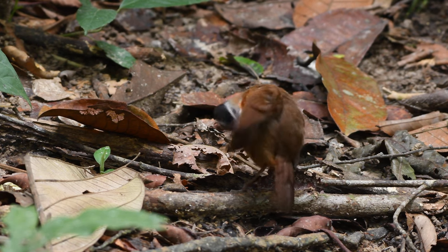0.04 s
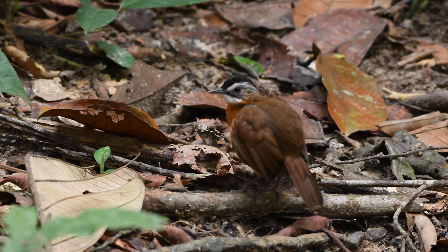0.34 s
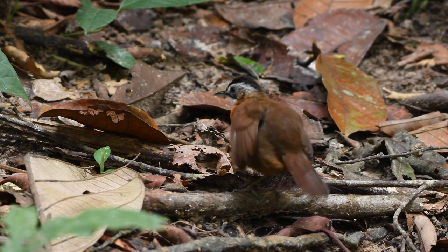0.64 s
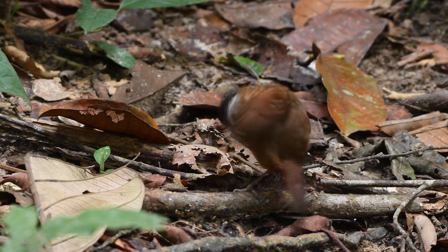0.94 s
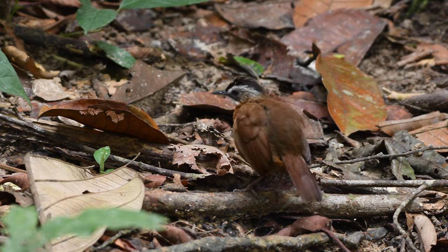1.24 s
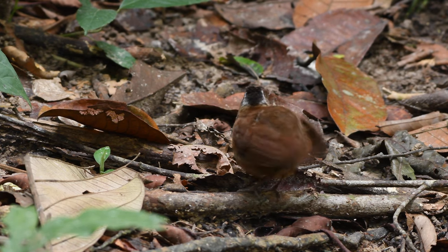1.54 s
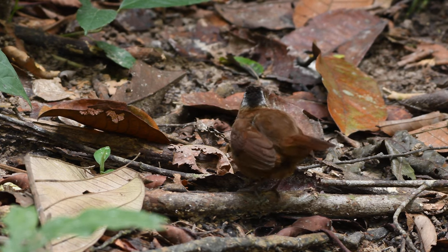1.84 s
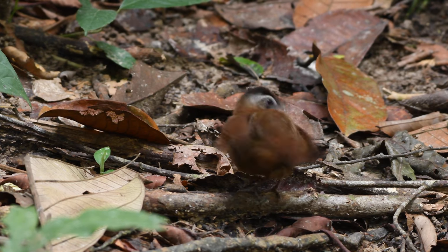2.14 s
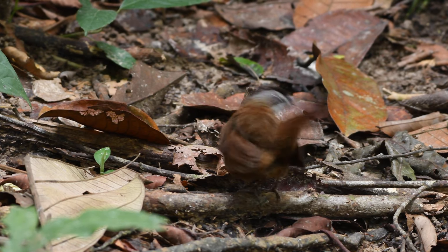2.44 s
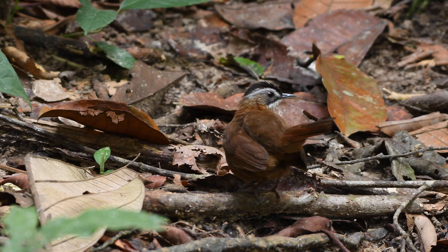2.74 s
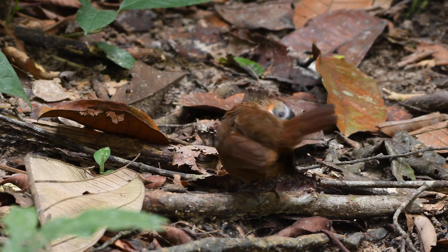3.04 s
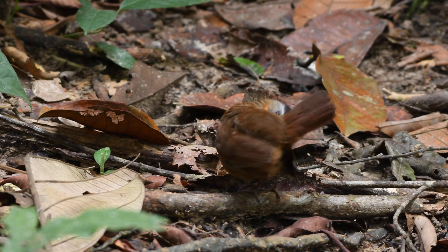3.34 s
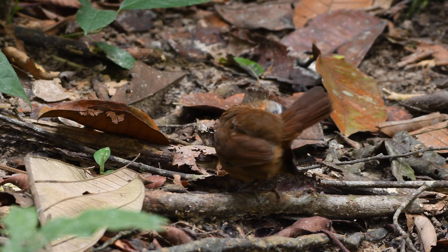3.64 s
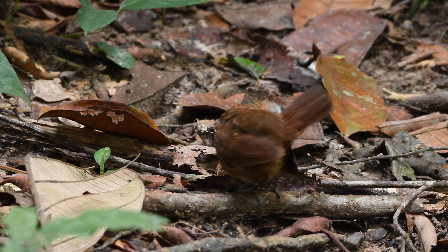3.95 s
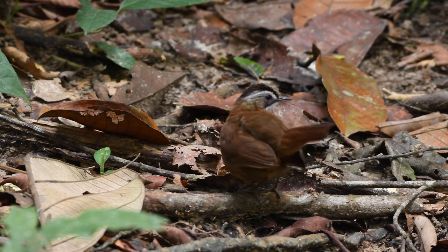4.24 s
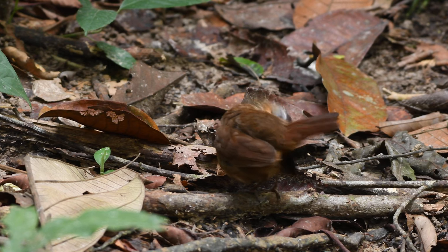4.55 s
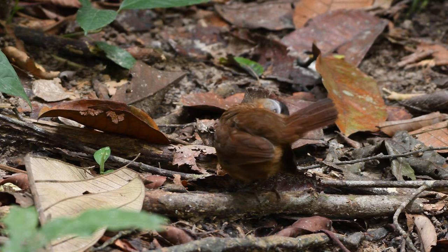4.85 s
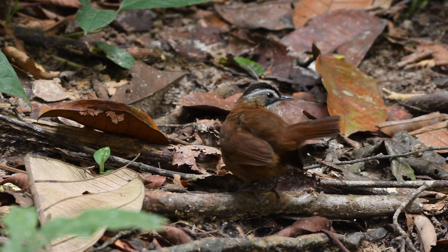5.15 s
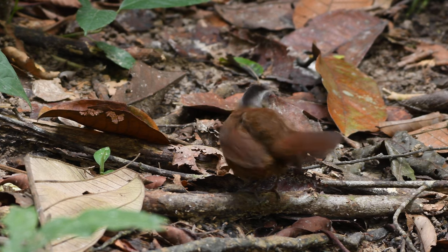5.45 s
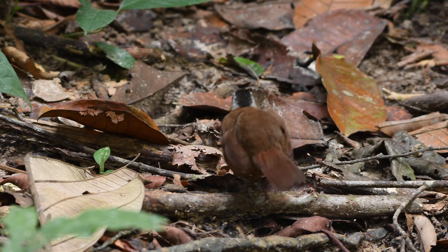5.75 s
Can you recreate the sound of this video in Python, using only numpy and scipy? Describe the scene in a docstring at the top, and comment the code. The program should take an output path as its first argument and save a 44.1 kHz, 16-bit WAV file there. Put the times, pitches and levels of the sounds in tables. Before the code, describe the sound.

A high, shrill cicada chorus drones steadily for the whole six seconds in a forest, over a very faint low rumble. Single insects trill through it in fast-pulsing phrases of about half a second, and a thin buzz swells and fades. One faint low hoot sounds at the very start. Distant birds give quiet, echoing whistles and slurs throughout, with runs of short piping notes around 1.5 to 1.9 and 2.9 to 3.7 seconds. Close by, the leaf litter ticks faintly; a soft thud comes at 1.4 seconds, small twig snaps on the right at 1.6 and 1.9, and faint rustles near 2.4 and 3.1. From about 4.4 seconds to the end, a nearer bird on the left whistles six clear notes, each scooping upward, the series falling in pitch and growing longer and louder. It stands out above the insects and echoes among the trunks.

```python
"""A chorus of cicadas drones near 5.7 kHz over a forest floor by day, each sweeping its pitch about 22
times a second as a muscle tightens its membrane and lets go. Single insects trill in, above and below it.
A bird whistles a falling series of scooped notes, others call from far off, and a few things tick in the
leaf litter. The trunks scatter it all over a faint low rumble."""
import sys
import numpy as np
from scipy import signal
from scipy.fft import rfft, irfft
from scipy.io import wavfile

SR = 44100
rng = np.random.default_rng(int(sys.argv[2]) if len(sys.argv) > 2 else 0)


def materialize(psi):
    """Save the field psi as 16-bit PCM at rate SR to the path in sys.argv[1].

    A 1-D psi becomes a single channel; in a 2-D psi each row is a channel.
    """
    bounded = np.clip(np.atleast_2d(psi).T, -1, 1)
    quanta = np.round(bounded * 32767).astype(np.int16)
    wavfile.write(sys.argv[1], SR, quanta)


N = 254898
TIME = np.arange(N) / SR


# The blur of far cicadas, and its octave. Each row: frequency in Hz, relative level in dB.
DRONE_SPECTRUM = [(4300, -27), (4750, -24.5), (5000, -13.5), (5200, -4.5), (5400, 3), (5600, 1.5),
                  (5850, 6.5), (6020, -4), (6200, -5), (6450, -14.5), (6800, -26.5), (7200, -66),
                  (7700, -130.5)]
OCTAVE_SPECTRUM = [(9500, -44.5), (10100, -3.5), (10500, 1.5), (10800, 7), (11400, 5.5), (11900, 0.5),
                   (12600, -18), (14000, -35.5)]

def cicada_chorus(count=9):
    """Cicadas sweep out of step among the trees; countless far ones blur into a band and its octave."""
    voices = np.zeros((2, N))
    for _ in range(count):
        cycle = rng.random() + np.cumsum(22.4 + 0.3197 * wander(1.3)) / SR
        stroke = muscle_stroke(cycle, crest=0.689)
        hz = 5380 + 480 * stroke + 50 * wander(1.5) + 35 * wander(700)
        pulse = 0.062 + np.sin(np.pi * stroke)  # loudest midway through each rise and fall
        voice = tone(hz) * pulse * undb(1.7 * wander(1.1))
        voices += forest(voice * pan(3 * rng.standard_normal()), t60=0.64, wet_db=5)
    blur = colour(rng.standard_normal((2, N)), DRONE_SPECTRUM)
    blur *= undb(0.13 * wander(7) + .5 * wander(30))
    octave = colour(rng.standard_normal((2, N)), OCTAVE_SPECTRUM) * undb(0.47 * wander(4))
    drone = level(voices, -38.5) + level(blur, -35)
    return drone * pan(-3.5) + level(octave, -67) * pan(10.3)


def muscle_stroke(cycle, crest):
    """A muscle tightens the sounding membrane and lets go: 0 up to 1 at the crest and back."""
    return np.sin(np.pi / 2 * np.interp(cycle % 1, [0, crest, 1], [0, 1, 0]))


# Phrases of three soloists. Each row: start in seconds, length in seconds.
NEAR_PHRASES = [(.019, 0.59), (1.243, 0.44), (2.689, .66), (4.311, 0.48)]
LOW_PHRASES = [(.55, 0.57), (1.45, .63), (2.33, .64), (3.3, .55)]
HIGH_PHRASES = [(.385, 0.87), (1.62, .59), (2.52, .67), (3.5, 0.57), (4.47, .57), (5.46, 0.64)]

def solo_insects():
    """A near cicada stands out, with a lower trill further off and a very high one to the left."""
    near = trill(NEAR_PHRASES, chirps_per_s=22.2, top_hz=5930, db=-43.5,
                 depth_hz=1000, climb_hz=30, rasp_hz=25, crest=.7, punch=2.5)
    low = trill(LOW_PHRASES, chirps_per_s=21.9, top_hz=4920, db=-58.5,
                depth_hz=258.6, climb_hz=13, rasp_hz=25.5, crest=.55, punch=0.74)
    high = trill(HIGH_PHRASES, chirps_per_s=22.7, top_hz=11040, db=-69.8,
                 depth_hz=1300, climb_hz=400, rasp_hz=40, crest=.5, punch=3)
    return forest(near * pan(4) + low + high * pan(12), t60=.6, wet_db=-11)


def trill(phrases, chirps_per_s, top_hz, db, depth_hz, climb_hz, rasp_hz, crest, punch):
    """Arched chirps, loudest at the top of each arch; the pitch climbs as a phrase gets going."""
    out, rasp = np.zeros((2, N)), wander(900)
    for start, length in phrases:
        t = TIME[:int(length * SR)]
        stroke = muscle_stroke(chirps_per_s * t, crest)
        arch_hz = top_hz - depth_hz * (1 - stroke)
        hz = arch_hz - climb_hz * np.exp(-t / .18) + rasp_hz * rasp[:len(t)]
        envelope = stroke ** punch * signal.windows.tukey(len(t), .05)
        add(out, start, tone(hz) * level(envelope, db))
    return out


# Swells of a thin buzz. Each row: start in seconds, length in seconds, level at the top in dB.
BUZZ_SWELLS = [(0.145, 0.51, -54), (1.237, 0.24, -60), (2.336, .55, -55), (3.346, 0.31, -61.5),
               (4.278, 0.54, -55.5), (5.285, 0.97, -57.5)]

def thin_insects():
    """A buzz just above the chorus swells fast and dies away, over a faint high whine."""
    buzz = np.array([tone(6930 + 130 * wander(900)) for _ in range(2)])
    whine = np.array([tone(8460 + 55 * wander(500)) for _ in range(2)])
    swells = np.zeros((1, N))
    for start, length, db in BUZZ_SWELLS:
        progress = TIME[:int(length * SR)] / length
        add(swells, start, undb(db) * np.interp(progress, [0, .2, 1], [0, 1, 0]))
    return buzz * swells + forest(whine, t60=.5, wet_db=10.5) * undb(-86.5)


# The falling song. Each row: start in seconds, length in seconds, target pitch in Hz, scoop time in
# seconds, level before the accent in dB, accent time in seconds into the note, accent gain in dB.
SONG_NOTES = [(4.357, 0.062, 6100, 0.1, -47.5, 0.058, -8), (4.519, .11, 3980, .06, -44.5, 0.057, 4),
              (4.728, .16, 3135, .025, -37.5, .071, 4.5), (4.986, 0.2115, 2962, .027, -38, 0.18, 13),
              (5.312, .36, 2826, .024, -36, 0.254, 4), (5.675, 0.4, 2723, .018, -36.5, 0.08, 6.5)]

def near_bird():
    """Each note scoops up toward its pitch; higher notes start higher and rasp more."""
    clean_hz, accent_half_width_s, ear_lag_s = 2713, 0.032, .00007
    voice, accent_db = np.zeros((1, N)), np.zeros(N)
    for start, length, target_hz, scoop_s, db, accent_at, gain_db in SONG_NOTES:
        t = TIME[:int(length * SR)]
        start_hz = 2053 + .2 * (target_hz - clean_hz)
        hz = target_hz + (start_hz - target_hz) * np.exp(-t / scoop_s)
        waver = 0.00087 + 0.011 * np.log2(target_hz / clean_hz)
        add(voice, start, whistle(hz, db, attack_s=.06, release_s=.018, waver=waver, flutter_db=2.6))
        accent_db += gain_db * np.exp(-((TIME - start - accent_at) / accent_half_width_s) ** 2)
    delayed = np.interp(TIME - ear_lag_s, TIME, voice[0])
    direct = np.array([voice[0], delayed]) * pan(10.5)  # the left ear hears it louder and sooner
    near_trunks = forest(direct, t60=.2, wet_db=-4.5)
    echoes = forest(near_trunks, t60=0.96, wet_db=-2.5) - direct
    return direct * undb(accent_db) + echoes  # accents ride the direct sound; the echoes stay even


def whistle(hz, db, attack_s, release_s, waver, flutter_db, shape_db=0):
    """One near-pure bird note on a pitch curve: it opens, wavers and flutters a little, and stops."""
    t = TIME[:len(hz)]
    attack = np.minimum(t / min(attack_s, t[-1] / 2), 1) ** 1.33
    release = np.minimum((t[-1] - t) / release_s, 1)
    envelope = attack * release * undb(shape_db + flutter_db * wander(45)[:len(t)])
    wavering_hz = hz * (1 + waver * wander(170)[:len(t)])
    return tone(wavering_hz) * level(envelope, db)


def hoot(start=0.075, length=0.14, hz=809, fade_db_per_s=130):
    """A bird a little way off gives one soft, low note that fades at once."""
    out, t = np.zeros((2, N)), TIME[:int(length * SR)]
    note = whistle(np.full(len(t), hz), db=-56.5, attack_s=0.051, release_s=.023,
                   waver=.0026, flutter_db=-1.5, shape_db=-fade_db_per_s * t)
    add(out, start, note)
    return forest(out, t60=0.57, wet_db=-4)


# Far piping. Each row: start in seconds, held pitch in Hz, relative level in dB, left minus right in dB.
PIPE_NOTES = [(1.55, 2495, -61, -22), (1.665, 2718, -50.5, 1), (1.761, 2600, -51, 8),
              (1.849, 2870, -53.5, -21), (2.905, 2455, -55.5, -2), (3.01, 2653, -55.5, -22.5),
              (3.126, 2600, -53.5, -16), (3.201, 2850, -51.5, -9), (3.395, 2600, -52, 5),
              (3.596, 2770, -51.5, 2), (5.179, 2500, -57.5, -7), (5.285, 2655, -45, -10)]

def piping_birds(length=0.055):
    """Short notes of one shape: a quick scoop up to a held pitch."""
    out, t = np.zeros((2, N)), TIME[:int(length * SR)]
    scoop = 1 - .13 * np.exp(-t / 0.00985)
    for start, hz, db, pan_db in PIPE_NOTES:
        note = whistle(hz * scoop, db, attack_s=.011, release_s=0.01, waver=0.0079, flutter_db=3.5)
        add(out, start, note * pan(pan_db))
    return out


# Drawn-out, rough whistles and clear slurs. Each row: start in seconds, length in seconds,
# first pitch in Hz, last pitch in Hz, relative level in dB, left minus right in dB.
DRAWN_NOTES = [(0, 0.73, 3384, 3364, -61, 12), (0, 1.67, 1978, 2213, -60, -3),
               (1.2, 0.76, 1650, 1610, -63, 5), (1.41, .1, 3360, 3380, -58.5, 4),
               (3.05, 0.17, 1596, 1605, -57.5, -2), (3.3, 0.19, 3475, 3560, -60, -3)]
SLURRED_NOTES = [(0, .07, 2854, 2760, -57, 15), (.12, 0.049, 3150, 2370, -55.5, -6),
                 (.45, .2, 4160, 4280, -65.5, 4), (1.8, 0.084, 1593, 1596, -55.5, 11.5),
                 (1.93, .29, 1826, 1990, -54.5, 4), (3.705, 0.097, 2184, 3220, -53, -12),
                 (4.02, .02, 3380, 2810, -49, 5), (4.07, 0.025, 2060, 1475, -54.5, 8),
                 (4.16, .39, 1187, 1220, -67.5, -5.5), (4.72, 0.35, 3520, 3474, -52.5, -2)]

def far_birds():
    """Pipes, whistles and slurs from deep in the forest arrive mostly as reverb tail."""
    drawn = glides(DRAWN_NOTES, waver=.024, flutter_db=3)
    pipes = piping_birds()
    slurs = glides(SLURRED_NOTES, waver=0.0063, flutter_db=-0.5)
    return undb(-6.5) * forest(pipes + drawn + slurs, t60=1.1, wet_db=4)


def glides(notes, waver, flutter_db):
    """Whistled notes that slide evenly from one pitch to another."""
    out = np.zeros((2, N))
    for start, length, first_hz, last_hz, db, pan_db in notes:
        hz = np.linspace(first_hz, last_hz, int(length * SR))
        note = whistle(hz, db, attack_s=0.0089, release_s=.009, waver=waver, flutter_db=flutter_db)
        add(out, start, note * pan(pan_db))
    return out


# What rings in the litter. Each row: resonance in Hz, bandwidth in Hz, relative level in dB.
TWIG_MODES = [(1930, 480, 7.5), (960, 1150, -2), (3400, 1100, -6)]
LEAF_MODES = [(1050, 660, 0)]
GROUND_MODES = [(254, 116, 0), (370, 420, -3)]
# The hits on them. Each row: start in seconds, level in dB, left minus right in dB.
TWIG_SNAPS = [(1.624, -40, -23.5), (1.64, -52, -15), (1.886, -44, -25)]
LEAF_TAPS = [(.854, -57.5, -5), (1.412, -55.5, -23), (2.284, -53, -2), (5.719, -52.5, 1)]
GROUND_THUDS = [(1.414, -45.5, -4), (3.125, -57, 1)]

def leaf_litter():
    """Twigs snap, leaves tick and rustle, and the ground thuds, all close and fairly dry."""
    snaps = strikes(TWIG_SNAPS, TWIG_MODES, t60=0.024)
    taps = strikes(LEAF_TAPS, LEAF_MODES, t60=0.092)
    thuds = strikes(GROUND_THUDS, GROUND_MODES, t60=0.11)
    return forest(snaps + taps + thuds + rustles() + stray_ticks(), t60=0.32, wet_db=-14.5)


def stray_ticks(per_s=3.6, db=-59.5, spread_db=1.5, width_db=10):
    """Faint ticks among the leaves, at chance times and places."""
    gap, strength, side = rng.random((64, 3)).T
    starts = np.cumsum(-np.log(1 - gap)) / per_s
    hits = np.column_stack([starts, db + spread_db * (2 * strength - 1), width_db * (2 * side - 1)])
    return strikes(hits[starts < TIME[-1]], LEAF_MODES, t60=.04)


def strikes(hits, modes, t60):
    """Each hit is a short noise burst that rings the damped resonances of a body."""
    out, t = np.zeros((2, N)), TIME[:SR // 4]
    fade = undb(-60 * t / t60)
    fade_rms = np.sqrt(np.mean(fade ** 2))
    for start, db, pan_db in hits:
        burst, ring = rng.standard_normal(len(t)) * fade, 0
        for hz, width_hz, mode_db in modes:
            b, a = signal.iirpeak(hz, hz / width_hz, fs=SR)
            ring += level(signal.lfilter(b, a, signal.lfilter(b, a, burst)), mode_db)
        add(out, start, level(ring, db) * fade_rms * pan(pan_db))
    return out


# Soft rustles. Each row: start in seconds, length in seconds, level before the fades in dB.
LEAF_RUSTLES = [(2.278, 0.34, -61.5), (2.923, .36, -60.5)]

def rustles():
    """Leaves rustle as a grainy hiss that fades in and out."""
    out = np.zeros((2, N))
    band = signal.butter(1, [400, 2500], "band", fs=SR, output="sos")
    for start, length, db in LEAF_RUSTLES:
        size = int(length * SR)
        grains = rng.standard_normal((2, size)) * undb(1.5 * wander(200)[:size])
        add(out, start, level(signal.sosfilt(band, grains), db) * np.hanning(size))
    return out


# The bed of rumble and hiss. Each row: frequency in Hz, relative level in dB.
AIR_SPECTRUM = [(20, -14), (45, -4.5), (70, 3), (110, 0.5), (170, -4.5), (330, -9.5), (900, -12.5),
                (1700, -12.5), (2700, -12), (4300, -15.5), (7500, -57.5), (8500, -23), (10000, -59),
                (12500, -31), (15500, -31)]

def air():
    """Distant rumble and leaf hiss, alike in both ears in the bass, with a wavering low hum."""
    mid, side = colour(rng.standard_normal((2, N)), AIR_SPECTRUM)
    side = signal.sosfilt(signal.butter(1, 220, "high", fs=SR, output="sos"), side)
    bed = level(mid + 0.92 * side * np.array([[1], [-1]]), -56) * undb(.36 * wander(2.8))
    hum = tone(102 + 2.236 * wander(15)) * undb(-67 + 1.5 * wander(9.1))
    return bed + hum


def forest(x, t60, wet_db):
    """Direct sound plus the dense scatter of trunks and leaves, dying by 60 dB in t60 seconds."""
    t = TIME[:2 * SR]
    build_up = 1 - np.exp(-t / 0.0048)
    tail = rng.standard_normal((2, len(t))) * undb(-60 * t / t60) * build_up
    tail /= np.sqrt(np.sum(tail ** 2, axis=1, keepdims=True))
    wet = signal.fftconvolve(x.mean(axis=0, keepdims=True), tail, axes=1)[:, :N]
    return x + undb(wet_db) * wet


def undb(db):
    """Decibels to gain."""
    return 10 ** (np.asarray(db) / 20)


def level(x, db):
    """Scale to an rms level."""
    return x * undb(db) / np.sqrt(np.mean(x ** 2))


def pan(db):
    """Left and right gains; positive dB leans left."""
    return undb(np.array([[db], [-db]]) / 2)


def add(out, start, x):
    """Mix a sound in at a start time in seconds."""
    i = max(int(start * SR), 0)
    out[:, i:i + x.shape[-1]] += x[..., :max(N - i, 0)]


def wander(steps_per_s):
    """Smooth random modulation with a spread near 1."""
    steps = rng.standard_normal(8192)
    return 1.2 * np.interp(TIME * steps_per_s, np.arange(len(steps)), steps)


def tone(hz):
    """A sine of rms 1 that follows a pitch curve."""
    return np.sqrt(2) * np.sin(2 * np.pi * np.cumsum(hz) / SR)


def colour(x, spectrum):
    """Shape a sound with an EQ curve of (Hz, dB) points; nothing passes outside it."""
    hz, db = np.transpose(spectrum)
    bins_hz = np.maximum(np.fft.rfftfreq(N, 1 / SR), 1)
    curve_db = np.interp(np.log(bins_hz), np.log(hz), db, left=-np.inf, right=-np.inf)
    return irfft(rfft(x) * undb(curve_db), N)


def scene():
    """Insects and birds over the leaf litter and the air."""
    insects = cicada_chorus() + solo_insects() + thin_insects()
    birds = far_birds() + near_bird() + hoot()
    return insects + birds + leaf_litter() + air()


def record(dry):
    """A steep low-pass takes off the top above 15.7 kHz."""
    return signal.sosfilt(signal.ellip(10, .2, 70, 15700, fs=SR, output="sos"), dry)


dry = scene()
out = record(dry)
materialize(out)
```